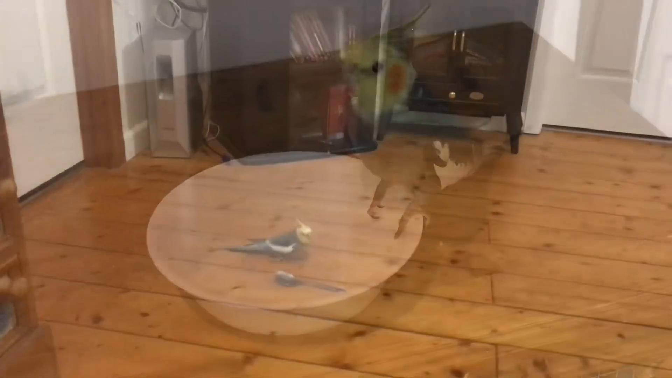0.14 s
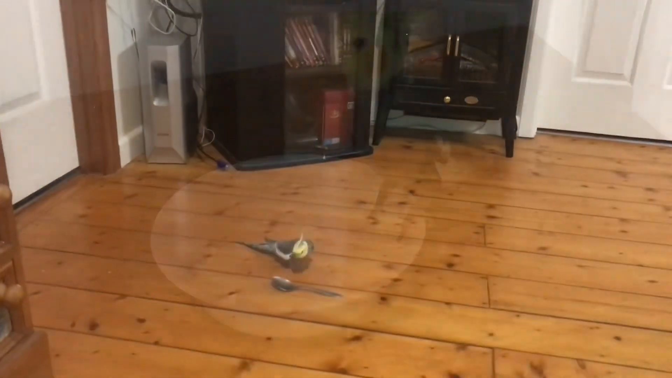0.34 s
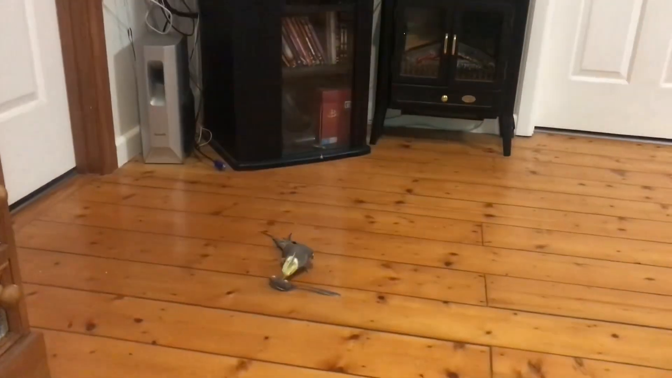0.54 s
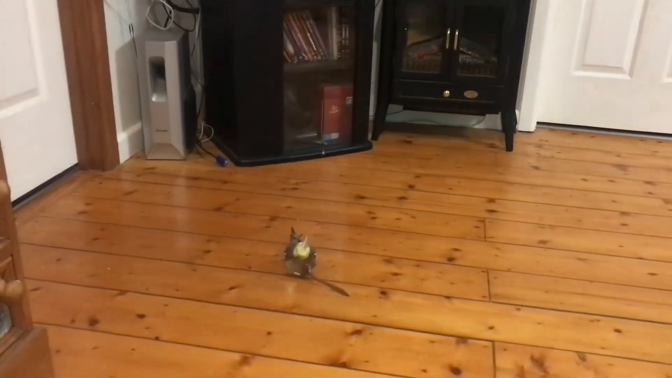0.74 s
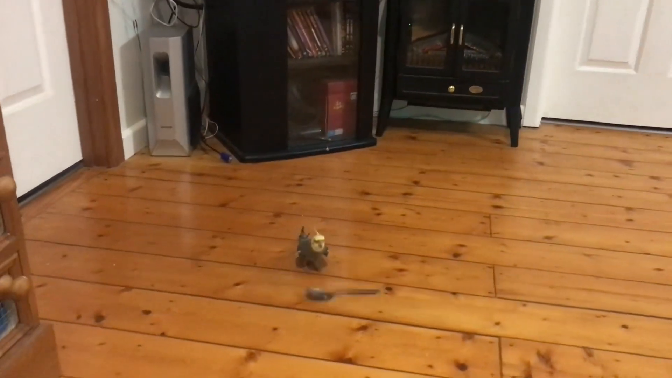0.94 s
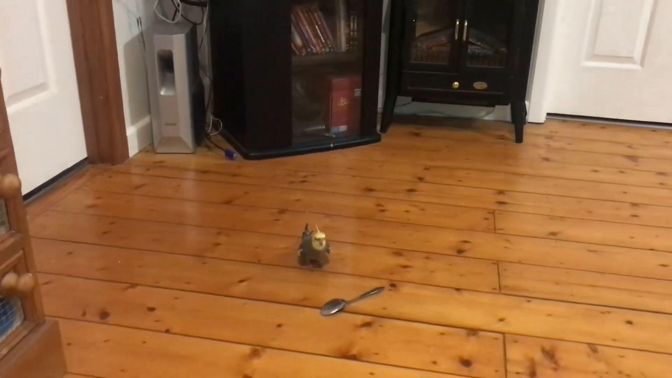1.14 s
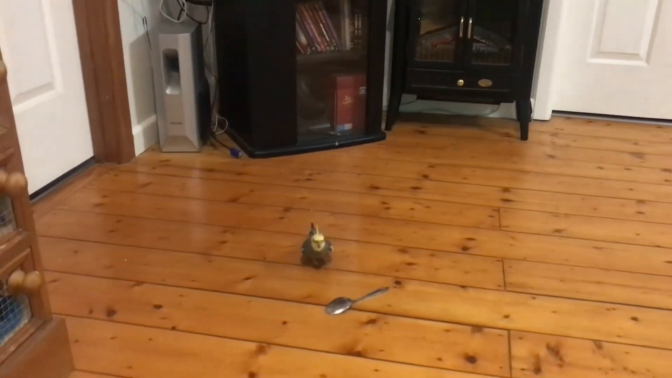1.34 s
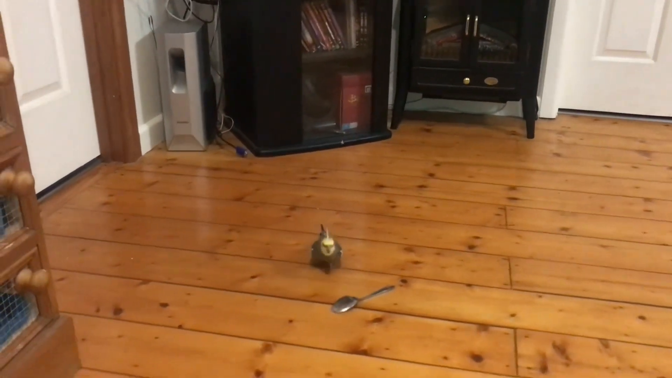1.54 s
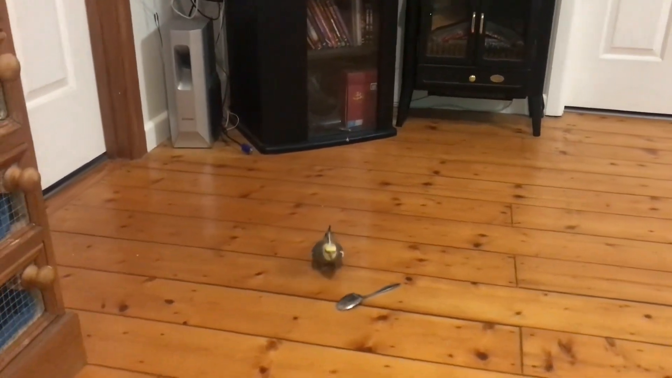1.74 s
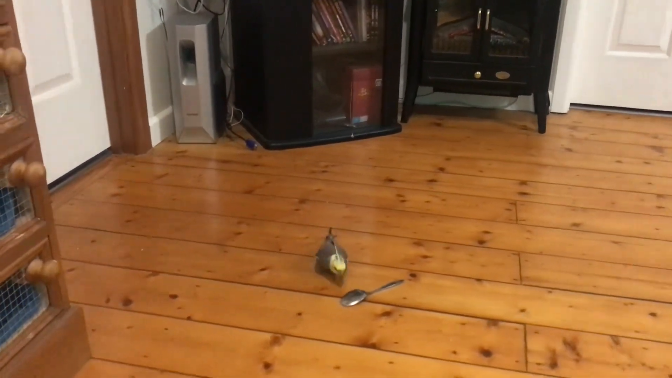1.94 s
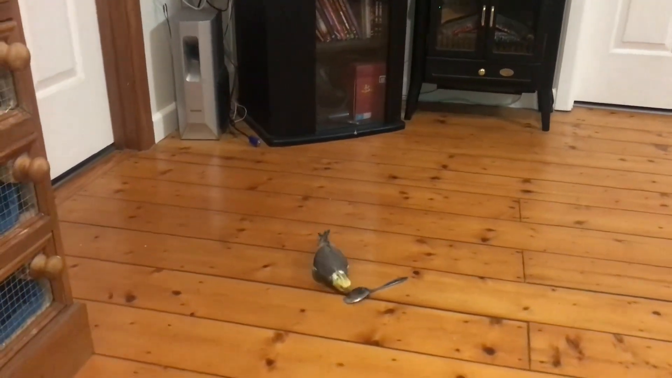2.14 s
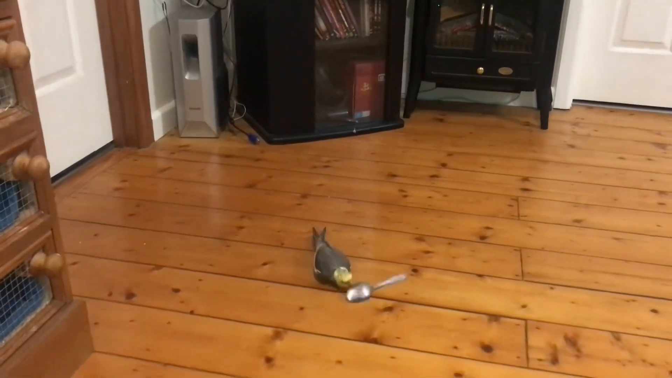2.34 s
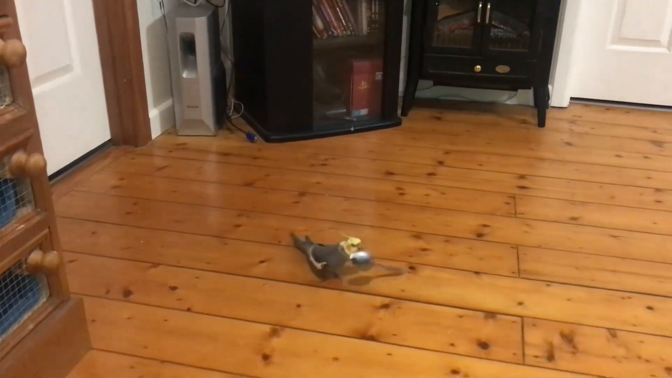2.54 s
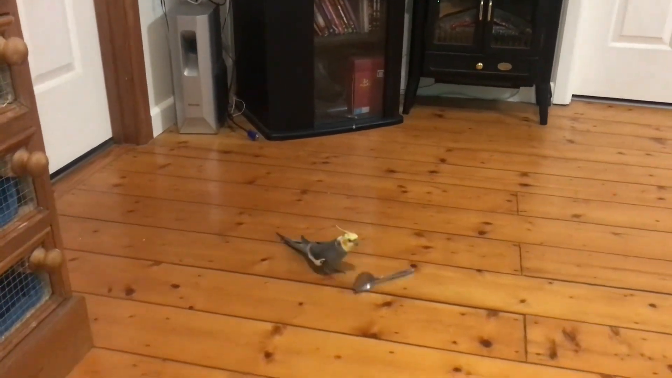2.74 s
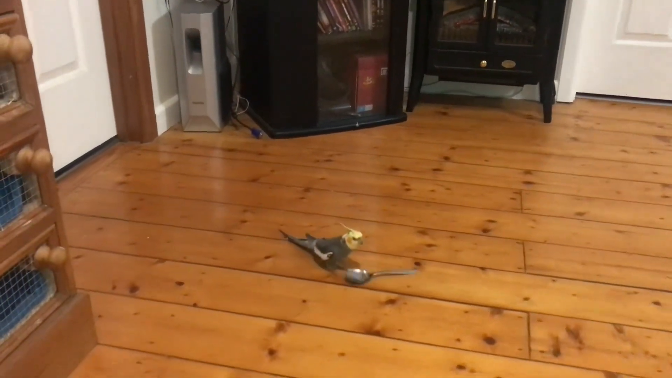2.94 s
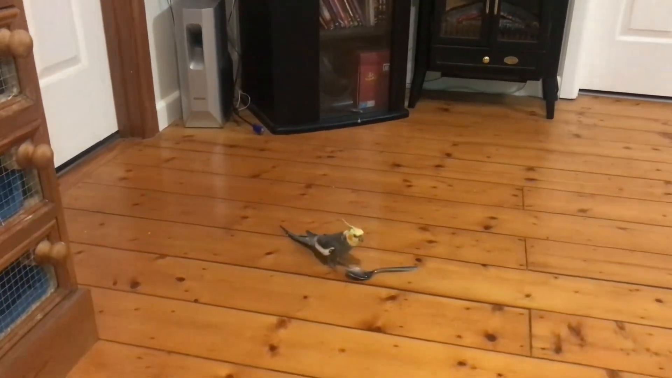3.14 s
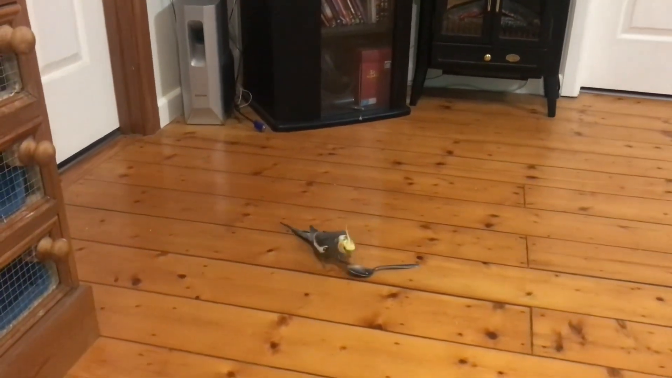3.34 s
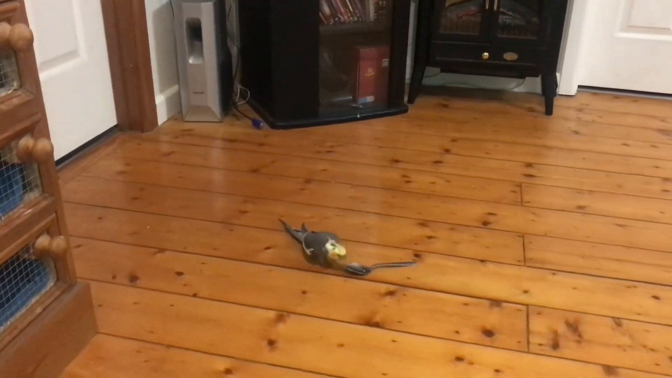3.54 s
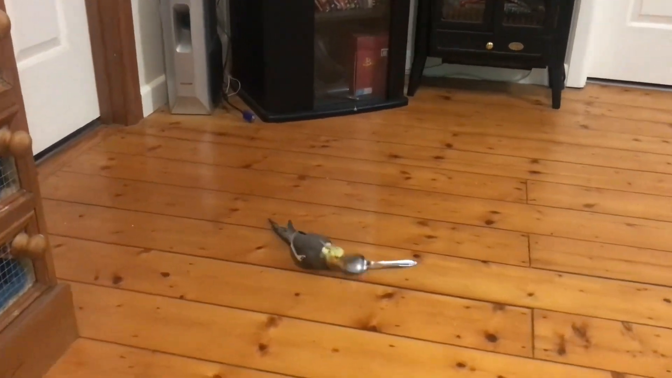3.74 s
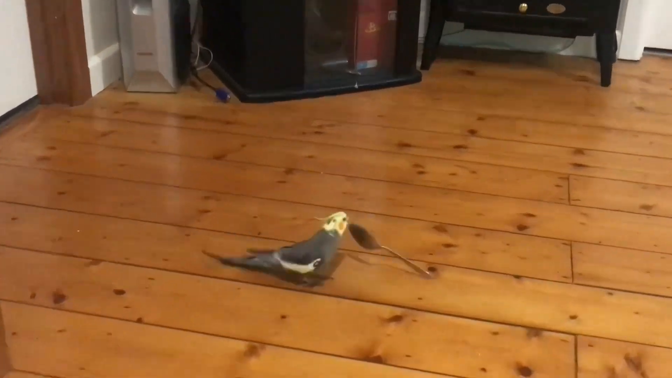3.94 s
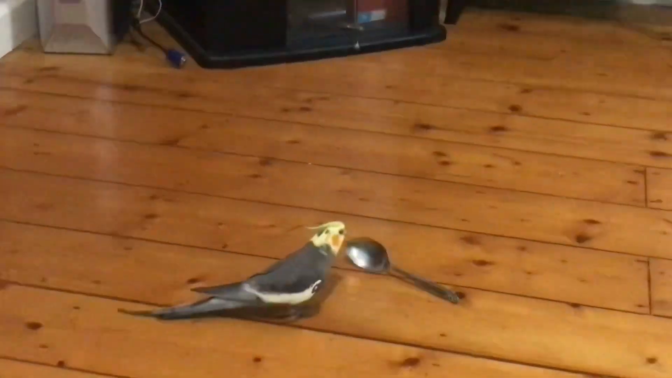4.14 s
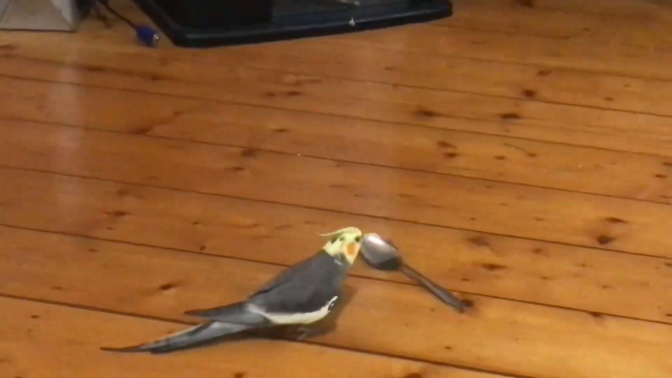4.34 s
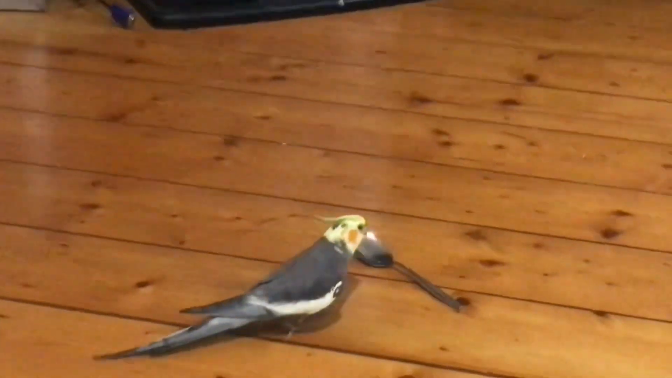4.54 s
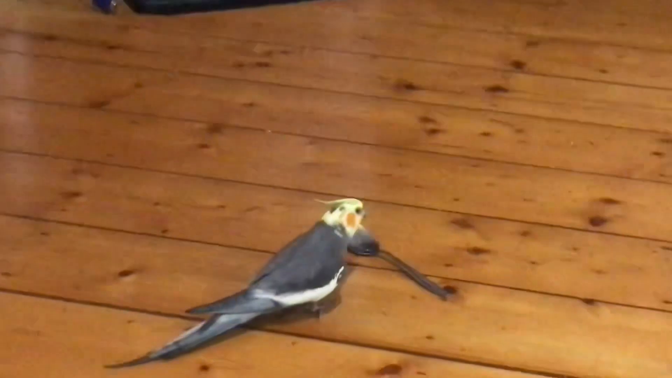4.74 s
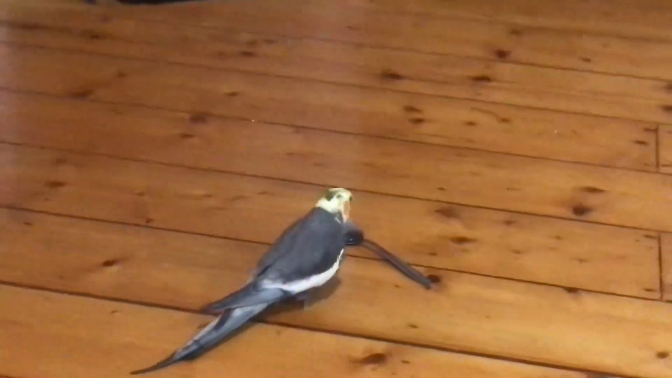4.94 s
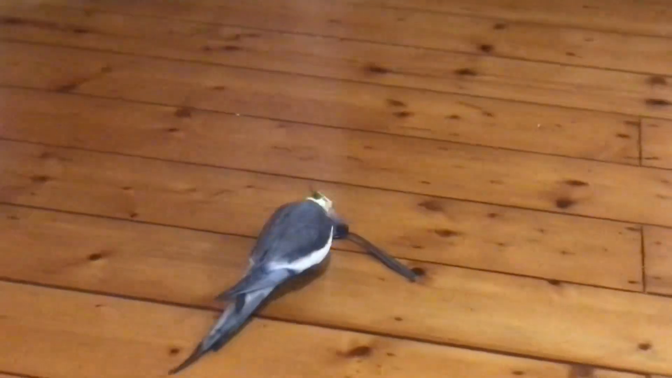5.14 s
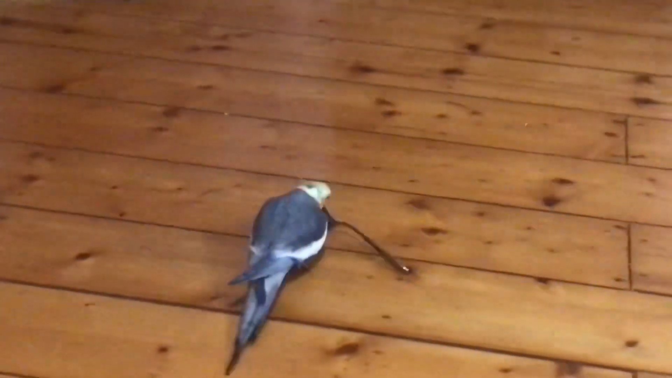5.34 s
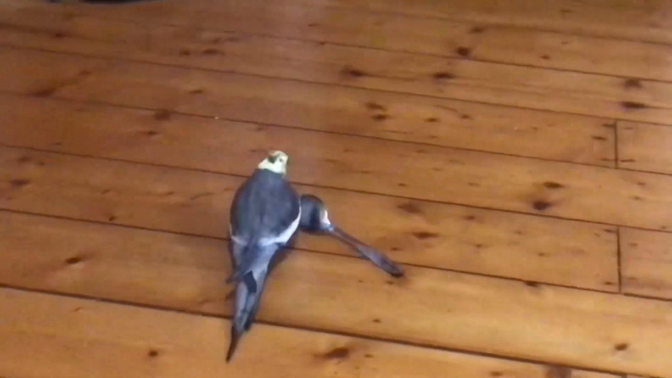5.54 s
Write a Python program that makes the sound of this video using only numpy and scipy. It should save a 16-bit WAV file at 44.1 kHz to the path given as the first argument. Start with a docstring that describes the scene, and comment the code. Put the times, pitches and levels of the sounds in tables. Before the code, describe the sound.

In a live, hard-floored room, the tail of a bird's whistle fades over low rumble. A steel spoon drops on floorboards three times, with woody knocks, sharp clicks, a brief thin ring and quick rattling. After each fall a cockatiel gives a chip, a low hoot, a loud falling chirp and a soft arching whistle. Faint beak and foot taps fill the gaps. The microphone is in the room, with clear echo.

```python
"""Cockatiel and spoon

A cockatiel in a live room picks up a steel spoon and drops it on the floorboards three times.
Each time the boards knock (bursts of shaped noise, deep sine modes) and the spoon rings (dying sines).
The spoon bounces and rocks to rest (tiny random taps), and the bird whistles a short phrase (gliding sines).
In between, beak and feet tap softly; the end of an earlier phrase opens the scene over a low room rumble."""
import sys
import numpy as np
from scipy import signal
from scipy.fft import rfft, irfft
from scipy.io import wavfile
from scipy.ndimage import map_coordinates

SR = 44100
rng = np.random.default_rng(int(sys.argv[2]) if len(sys.argv) > 2 else 0)


def store_pcm(level_fs):
    """Save levels as 16-bit WAV."""
    pcm = np.round(np.clip(level_fs, -1, 1) * 32767).astype(np.int16)
    wavfile.write(sys.argv[1], SR, np.atleast_2d(pcm).T)


N = 246959
LEAD_S = 0.4  # time computed before the scene begins, so that earlier sounds can ring into it
TIME = np.arange(-round(LEAD_S * SR), N) / SR

# Levels in the tables are relative; the functions below balance the layers.
# Spectrum shape of the room's steady noise: pitch_hz, level_db
ROOM_TONE_SPECTRUM = [(21, -34), (35, 1.5), (63, 5), (143, -14), (185, -8), (360, -17), (798, -25.5),
                      (1300, -30), (16000, -50.5)]
# How long the echo takes to fall by 60 dB at each pitch: pitch_hz, fall_time_s
ROOM_FALL_TIMES = [(100, 0.79), (1000, 0.68), (1800, 0.75), (3200, 0.56), (6000, 0.57), (14000, 0.52)]
# First reflections from the walls: delay_s, level_db
WALL_REFLECTIONS = [(.0042, -25), (0.0107, -5.5), (0.021, -12)]
# Deep modes of the floor: pitch_hz, time_to_fall_60_db_s, level_db
FLOOR_MODES = [(68.3, 0.35, -13.5), (181.9, 0.25, -7.5), (314, 0.42, -17), (424, 0.1, -17.5)]
# Spectrum shape of a knock on the wood: pitch_hz, level_db
WOOD_SPECTRUM = [(41, -47.5), (70, 1.5), (118, -10.5), (168, 2.5), (297, 3.5), (536, -8), (630, -2.5),
                 (1020, 5), (1360, -5), (1620, -4.5), (2280, -15.5), (2720, -17), (2980, -58), (3440, -19),
                 (5000, -72.5), (6500, -39), (11000, -120)]
# Spectrum shape of the hard click of steel on wood: pitch_hz, level_db
CLICK_SPECTRUM = [(1200, -23.5), (2200, 9), (3000, 11), (4200, 3), (5500, -6), (8000, -20), (12000, -27.5),
                  (16000, -31.5)]
# The spoon's modes: pitch_hz, time_to_fall_60_db_s
SPOON_MODES = [(2700, .25), (3338, .24), (4177, .35), (5354, .55), (6166, .7), (8465, .5), (8613, .45),
               (9695, .45), (11395, .3), (12115, .28), (12650, .33), (13770, .28)]
# Strength of each spoon mode, in the same order, for the three places where the spoon can be hit:
# spot_0_db, spot_1_db, spot_2_db
SPOT_LEVELS = [(1.5, -9, -16), (-11.5, -1, 7.5), (-15, -13.5, -20.5), (-20.5, -12.5, -12),
               (-20, -8.5, -18.5), (-16.5, -20.5, -30), (-21, -12.5, -36), (-15, -15.5, -28),
               (-25, -21.5, -33), (-23.5, -24, -30), (-28.5, -25.5, -43), (-24, -21, -30.5)]
# The spoon falls and bounces on the boards: start_s, knock_db, click_db, ring_db, spot (0 to 2)
BOUNCES = [(0.9961, -16.5, -24.5, -44, 0), (1.061, -31, -39, -50, 1), (1.1045, -21, -21, -33.5, 0),
           (1.163, -33, -26.5, -50, 0), (1.221, -32.5, -29.5, -40.5, 0), (1.277, -37, -29.5, -49.5, 0),
           (2.7133, -19.5, -19.5, -31, 1), (2.79, -27, -42.5, -43.5, 1), (2.85, -26.5, -34, -48.5, 1),
           (2.974, -37.5, -38, -65, 1), (4.0543, -13.5, -29, -41, 0), (4.0971, -18, -24, -32.5, 2),
           (4.294, -40.5, -55.5, -41, 2), (4.374, -31.5, -61, -45, 2)]
# Light taps of beak and feet: start_s, knock_db, click_db
PECKS = [(0.622, -40.5, -56), (.667, -36, -42), (0.702, -34, -67.5), (2.114, -43.5, -65),
         (2.362, -51.5, -72), (2.393, -41, -58.5), (3.672, -37.5, -55), (5.2527, -38, -52.5),
         (5.303, -44.5, -45.5), (5.43, -28.5, -58), (5.452, -34, -54)]
PECK_RING_DB = -39.5  # a tap barely rings the spoon: ring level relative to its knock
# All blows together: start_s, knock_db, click_db, ring_db, spot
BLOWS = BOUNCES + [(s, knock_db, click_db, knock_db + PECK_RING_DB, 1) for s, knock_db, click_db in PECKS]
# The spoon rocks to rest after each fall: start_s, length_s, level_db, fade_db_per_s
ROCKING = [(1.114, 0.21, -26, 76), (2.718, 0.47, -34.5, 12), (4.195, 0.42, -38.5, 9)]
# Overtones of the bird's voice: multiple (of the pitch), level_db
VOICE_OVERTONES = [(2, -25), (3, -37), (4, -45), (5, -45)]
# The phrase is a chip, a low note, a squeak that breaks into a loud chirp, and a low arch.
# Hoarse falling chips: start_s, length_s, top_pitch_hz, level_db
CHIPS = [(1.256, 0.02, 4690, -25), (2.885, 0.031, 4600, -28), (4.319, 0.037, 4680, -26.5)]
# Short low notes: start_s, length_s, top_pitch_hz, level_db
LOW_NOTES = [(1.362, 0.075, 1510, -33.5), (3.02, 0.061, 1576, -30.5), (4.462, 0.069, 1558, -36)]
# Loud falling chirps, each with a squeak before it: start_s, length_s, top_pitch_hz, level_db, squeak_db
CHIRPS = [(-.25, 0.1, 3680, -21.5, -51), (1.538, 0.0842, 3644, -16, -30.5), (3.181, .093, 3602, -17, -32),
          (4.627, 0.1, 3780, -17, -33.5)]
# Low arching whistles: start_s, length_s, top_pitch_hz, level_db
LOW_ARCHES = [(-.105, .19, 1823, -35), (1.68, 0.18, 1776, -32), (3.321, .176, 1842, -30),
              (4.788, .148, 1826, -31.5)]

SQUEAK_S, SQUEAK_OVERLAP_S = 0.05, 0.003  # squeak length, and its overlap with the chirp
SQUEAK_RATIO = 1.17  # squeak's top pitch relative to the chirp's
FULL_BRIGHT_HZ = 4100  # below this pitch the overtones grow weaker


def amp(db):
    """Turns decibels into a plain multiplier."""
    return 10 ** (np.asarray(db) / 20)


def unit(x):
    """Scales a sound to an average strength (rms) of 1."""
    return x / np.sqrt(np.mean(x ** 2) + 1e-20)


def read(points, hz):
    """Reads between a table's points, with pitch spaced as the ear hears it (logarithmically)."""
    table_hz, value = np.transpose(points)
    return np.interp(np.log(hz + 1), np.log(table_hz + 1), value)


def add(track, s, sound):
    """Mixes a sound into a track at time s, cutting it at the track's end."""
    part = track[round((s + LEAD_S) * SR):][:len(sound)]
    part += sound[:len(part)]


def ring(x, response):
    """Lets every sample of a track set off the given response (convolution)."""
    return signal.oaconvolve(x, response)[:len(x)]


def colour(points, size=4096):
    """Builds a short response with the given spectrum shape, energy 1 and nothing before the blow."""
    hz = abs(np.fft.fftfreq(size, 1 / SR))
    log_gain = np.log(amp(np.maximum(read(points, hz), -90)))
    minimum_phase = np.exp(np.conj(signal.hilbert(log_gain)))  # packs the energy at the start
    response = np.fft.ifft(minimum_phase).real[:size // 2]
    return response / np.linalg.norm(response)


def mode(hz, t60):
    """One way an object can vibrate: a sine that falls by 60 dB in t60 seconds."""
    t = np.arange(SR) / SR
    return np.sin(2 * np.pi * hz * t) * np.exp(-np.log(1000) * t / t60)


def sway(size, hz):
    """Smooth random motion of about unit strength: a curve through hz random points per second."""
    t = np.arange(size) / SR
    knots = rng.standard_normal(int(t[-1] * hz) + 3)
    return map_coordinates(knots, [t * hz], order=2, mode="nearest")


def room_tone(level_db=-53.5):
    """Low steady rumble of the house under a faint hiss: noise shaped by a spectrum."""
    hz = np.fft.rfftfreq(N, 1 / SR)
    shaped = rfft(rng.standard_normal(N)) * amp(read(ROOM_TONE_SPECTRUM, hz))
    return amp(level_db) * unit(irfft(shaped, N))


def room(x, tail_db, walls_db, build_s=0.018):
    """Direct sound, a few wall reflections and a dense noise tail that dies at its own rate in each band."""
    hz, t, bands = signal.stft(rng.standard_normal(SR), SR, nperseg=256)
    decay = np.exp(-np.log(1000) * t / read(ROOM_FALL_TIMES, hz)[:, None])
    tail = signal.istft(bands * decay, SR, nperseg=256)[1]
    tail_t = np.arange(len(tail)) / SR
    tail *= 1 - np.exp(-(tail_t / build_s) ** 2)  # the tail builds up gradually
    response = amp(tail_db) * tail / np.linalg.norm(tail)
    response[0] = 1  # direct sound
    for delay, db in WALL_REFLECTIONS:
        response[round(delay * SR)] += amp(db + walls_db)
    return ring(x, response)


def boom(taps, blow_db=-19, tap_db=-23, give=0.43):
    """Blows set off the floor's deep modes; give narrows the gap between light and hard blows."""
    pushes = amp(tap_db) * taps
    for s, knock_db, *_ in BLOWS:
        add(pushes, s, amp([give * knock_db + blow_db]))
    floor_response = sum(amp(db) * mode(hz, t60) for hz, t60, db in FLOOR_MODES)
    return ring(pushes, floor_response)


def contact(t60, push):
    """One sharp push followed by a dying scatter of waves in the boards, made of noise."""
    t = np.arange(SR // 3) / SR
    waves = rng.standard_normal(len(t)) * np.exp(-np.log(1000) * t / t60)
    waves[0] = push
    return waves


def knocks(taps, wood_t60=0.1, wood_push=12, click_t60=0.04, click_push=8, tap_wood_db=-1, tap_click_db=-16,
           soft_hz=4500, blunting=0.1):
    """Each blow knocks the wood and clicks; light blows push the wood less sharply, rolling clicks are dulled."""
    dull_filter = signal.butter(2, soft_hz, fs=SR, output="sos")
    wood = amp(tap_wood_db) * taps
    steel = amp(tap_click_db) * signal.sosfilt(dull_filter, taps)
    hardest_db = max(row[1] for row in BLOWS)
    for s, knock_db, click_db, _, _ in BLOWS:
        sharpness = amp(blunting * (knock_db - hardest_db))
        add(wood, s, amp(knock_db) * contact(wood_t60, sharpness * wood_push))
        add(steel, s, amp(click_db) * contact(click_t60, click_push))
    return ring(wood, colour(WOOD_SPECTRUM)) + ring(steel, colour(CLICK_SPECTRUM))


def rocking(per_s=600, spread_db=5.5, attack_s=0.025, release_s=0.11):
    """The bowl rolls over the grain: a dense run of tiny contacts at random moments and strengths."""
    level = np.zeros(len(TIME))
    for s, length, db, fade_db_per_s in ROCKING:
        t = np.arange(0, length, 1 / SR)
        gate = np.minimum(t / attack_s, 1) * np.minimum((length - t) / release_s, 1)
        add(level, s, gate * amp(db - fade_db_per_s * t))
    sizes = rng.standard_normal(len(TIME))
    contacts = rng.random(len(TIME)) < per_s / SR
    strengths = np.sign(sizes) * amp(spread_db * np.minimum(abs(sizes), 2))
    return level * unit(contacts * strengths)


def spoon(taps, swing=0.7, swing_hz=24, level_db=-2, tap_db=-27, chatter=0.34, chatter_hz=130):
    """Blows ring the steel and rocking keeps it faintly alive; its modes swell and fade as it turns."""
    out = np.zeros(len(TIME))
    for (hz, t60), spot_db in zip(SPOON_MODES, SPOT_LEVELS):
        softness = SPOON_MODES[0][0] / hz  # rolling contacts reach the high modes less
        partial = ring(amp(tap_db + min(spot_db)) * softness * taps, mode(hz, t60))
        for s, _, _, ring_db, spot in BLOWS:
            add(partial, s, amp(ring_db + spot_db[round(spot)]) * mode(hz, t60))
        partial *= 1 + chatter * sway(len(TIME), chatter_hz)  # touching the boards roughens the ring
        out += partial * np.exp(swing * np.tanh(sway(len(TIME), swing_hz)))
    return amp(level_db) * out


def progress(length):
    """Runs from 0 to 1 over a note of the given length in s."""
    return np.linspace(0, 1, round(length * SR))


def arch(u, top_at, first, last, rise_power, fall_power):
    """Pitch as a share of its top: climbs from first, rounds over at top_at and falls to last."""
    before = np.maximum(1 - u / top_at, 0)
    after = np.maximum((u - top_at) / (1 - top_at), 0)
    return 1 - (1 - first) * before ** rise_power - (1 - last) * after ** fall_power


def swell(u, attack, release, first_db, last_db):
    """Rise and fall of a note in dB; attack and release are shares of its length."""
    rise = first_db * np.maximum(1 - u / attack, 0)
    fall = last_db * np.maximum(1 - (1 - u) / release, 0)
    return rise + fall


def note(hz, db, hoarse=False, jitter=0.012, hoarse_jitter=0.042, jitter_hz=650, half_db=-16, dulling_db=30,
         rasp=0.38, rasp_hz=2800):
    """One gliding whistle with overtones; a hoarse one also trembles more and repeats every second cycle."""
    tremble = (hoarse_jitter if hoarse else jitter) * sway(len(hz), jitter_hz)
    pitch = hz * (1 + tremble)
    phase = 2 * np.pi * np.cumsum(pitch) / SR
    octaves_below = np.minimum(np.log2(pitch / FULL_BRIGHT_HZ), 0)
    brightness = amp(dulling_db * octaves_below)  # overtones fade as the pitch falls
    brightness *= 0.5 if hoarse else 1
    overtones = sum(amp(k_db) * np.sin(round(k) * phase) for k, k_db in VOICE_OVERTONES)
    tone = np.sin(phase) + brightness * overtones
    if hoarse:
        # tones at half and one and a half times the pitch
        tone += amp(half_db) * (np.sin(phase / 2) + 0.5 * np.sin(phase + phase / 2))
        # a fast flutter spreads the tone into a band
        tone *= (1 + rasp * sway(len(hz), rasp_hz)) / np.hypot(1, rasp)
    return amp(db) * tone * signal.windows.tukey(len(hz), 0.1)


def sinking_tone(first_hz=980, last_hz=770, db=-51, settle_s=0.04, fade_db=-9):
    """A faint tone that sinks, settles and fades while the spoon is first lifted."""
    start, length = 0.68, 0.29  # s
    u = progress(length)
    track = np.zeros(len(TIME))
    pitch = last_hz + (first_hz - last_hz) * np.exp(-u * length / settle_s)
    add(track, start, note(pitch, db + fade_db * u))
    return track


def chip(length, top_hz, db, drop=0.44):
    """A quick hoarse slide down, loudest about three quarters of the way through."""
    u = progress(length)
    level = db + swell(u, attack=0.96, release=0.25, first_db=-14, last_db=-10.5)
    return note(top_hz * (1 - drop * u), level, hoarse=True)


def low_note(length, top_hz, db):
    """A short soft hoot whose pitch makes a shallow arch."""
    u = progress(length)
    pitch = top_hz * arch(u, top_at=0.55, first=0.89, last=0.9, rise_power=1.8, fall_power=2.1)
    level = db + swell(u, attack=0.5, release=0.47, first_db=-8, last_db=-22.5)
    return note(pitch, level, jitter=0.039)


def low_arch(length, top_hz, db, waver_db=2.0, waver_hz=70):
    """A soft, slightly unsteady whistle that climbs, lingers and drops away."""
    u = progress(length)
    pitch = top_hz * arch(u, top_at=0.55, first=0.63, last=0.55, rise_power=2.0, fall_power=3.2)
    level = db + swell(u, attack=0.589, release=0.25, first_db=-11.5, last_db=-13)
    level += waver_db * sway(len(u), waver_hz)
    return note(pitch, level, jitter=0.02, jitter_hz=406.4)


def squeak(top_hz, db, burst_at=0.75, burst_rise=0.046, lead_db=-10, creep_db=-11):
    """A thin hoarse lead-in that creeps up and bursts out louder just before the chirp."""
    u = progress(SQUEAK_S)
    pitch = top_hz * arch(u, top_at=0.88, first=0.92, last=0.96, rise_power=0.8, fall_power=1.5)
    before_burst = np.clip((burst_at - u) / burst_rise, 0, 1)
    level = db + creep_db * (1 - u) + lead_db * before_burst
    return note(pitch, level, hoarse=True)


def chirp(length, top_hz, db, top_at=0.22, break_at=0.78, sag=0.29, plunge=0.29, break_db=-12, break_share=0.31,
          break_waver_db=4, burr_db=-31, burr_jitter=0.022):
    """A loud whistle that rounds over, sags, breaks up and plunges; a burr at thirds of its pitch starts it."""
    u = progress(length)
    plunged = np.maximum(u - break_at, 0) / (1 - break_at)
    sagged = np.sin(np.pi / 2 * (np.minimum(u, break_at) - top_at) / (break_at - top_at)) ** 2
    pitch = top_hz * (1 - sag * sagged - plunge * plunged)
    broken = np.minimum(plunged / break_share, 1)
    level = db + swell(u, attack=0.31, release=0.56, first_db=-22, last_db=-7.5)
    level += broken * (break_db + break_waver_db * sway(len(u), hz=502))
    burr_pitch = pitch * (1 + burr_jitter * sway(len(u), hz=905))
    third = 2 * np.pi * np.cumsum(burr_pitch) / (3 * SR)  # phase at a third of the pitch
    burr = sum(np.sin(k * third) * min(1, 5 / k) ** 2 for k in (2, 4, 5, 6, 7, 9, 10))
    burr_level = db + burr_db + swell(u, attack=0.05, release=0.9, first_db=-9, last_db=-57.5)
    return note(pitch, level) + burr * amp(burr_level)


def bird():
    """Two tracks: loud chirps, which beam from the open beak, and softer notes, which spread into the room."""
    loud, soft = np.zeros((2, len(TIME)))
    for s, length, top_hz, db, squeak_db in CHIRPS:
        squeak_start = s + SQUEAK_OVERLAP_S - SQUEAK_S
        add(loud, squeak_start, squeak(SQUEAK_RATIO * top_hz, squeak_db))
        add(loud, s, chirp(length, top_hz, db))
    for voice, rows in ((chip, CHIPS), (low_note, LOW_NOTES), (low_arch, LOW_ARCHES)):
        for s, *row in rows:
            add(soft, s, voice(*row))
    return loud, soft


def scene():
    """Spoon, floor and bird share the room, each with its own balance of direct sound and echo."""
    taps = rocking()
    loud, soft = bird()
    soft = soft + sinking_tone()
    floor = amp(-2.5) * room(knocks(taps), tail_db=-2.5, walls_db=-1.0) + boom(taps)
    steel = room(spoon(taps), tail_db=-6, walls_db=-12)
    song = room(loud, tail_db=-7, walls_db=-6.0)
    song += amp(-4.0) * room(soft, tail_db=-3.0, walls_db=3.5)
    events = (floor + steel + song)[-N:]  # drops the lead time
    return (events + room_tone())[None]


def record(dry, low_cut_hz=42, top_hz=15900):
    """The microphone's low cut and the recorder's upper band limit."""
    low_cut = signal.butter(3, low_cut_hz, "highpass", fs=SR, output="sos")
    cut = signal.sosfilt(low_cut, dry)
    band_limit = signal.firwin(511, top_hz, window=("kaiser", 9), fs=SR)
    return signal.oaconvolve(cut, band_limit[None], "same")


dry = scene()
out = record(dry)
store_pcm(out)
```